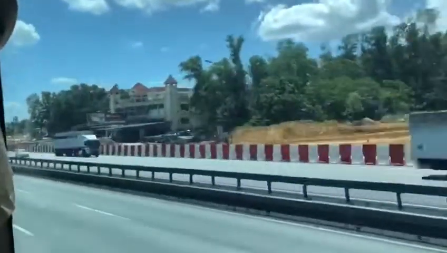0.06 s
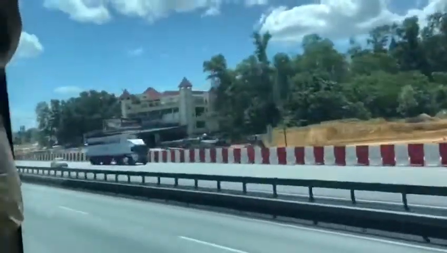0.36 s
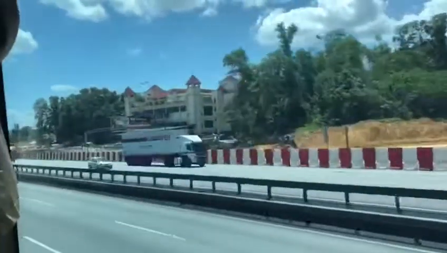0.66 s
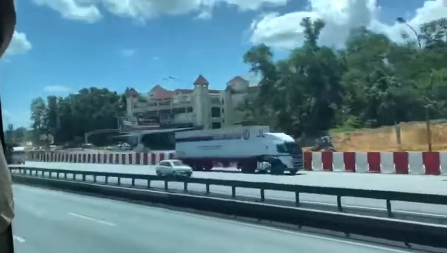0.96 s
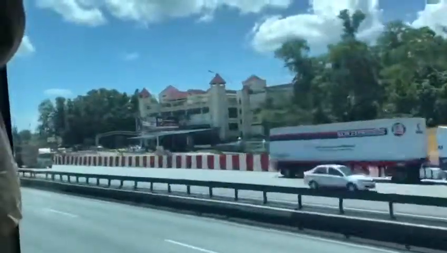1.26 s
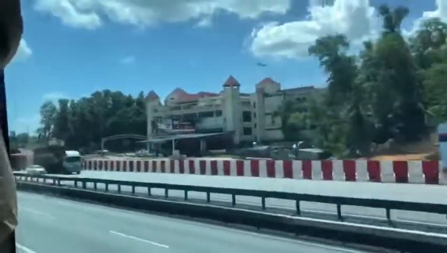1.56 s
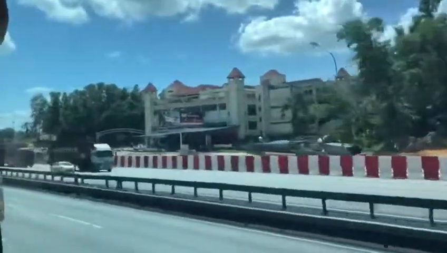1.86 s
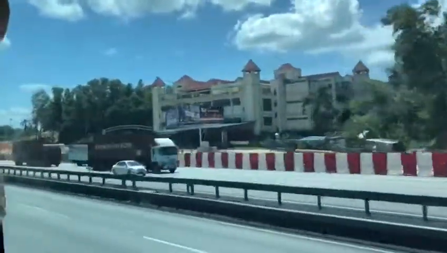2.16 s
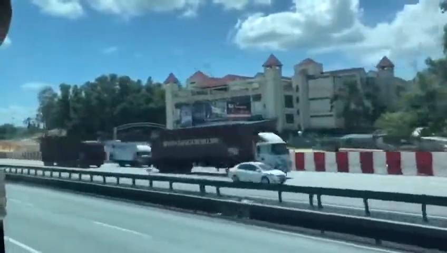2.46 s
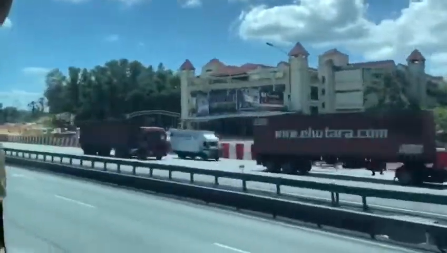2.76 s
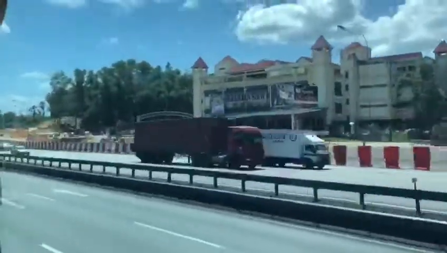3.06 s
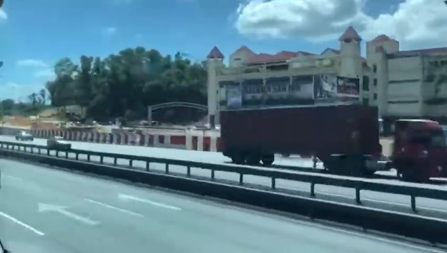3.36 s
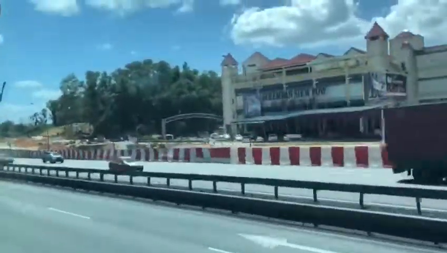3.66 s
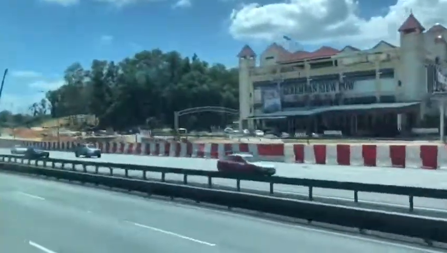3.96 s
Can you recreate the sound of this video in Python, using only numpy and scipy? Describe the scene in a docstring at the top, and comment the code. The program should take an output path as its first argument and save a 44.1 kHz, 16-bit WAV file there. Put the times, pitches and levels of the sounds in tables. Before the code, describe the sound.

A bus drones steadily along a highway, heard from inside, its engine booming over tyre rumble and wind hiss. Trim scrapes briefly at first, then a loose fitting squeaks, the wheels thump twice and oncoming traffic whooshes faintly.

```python
"""Inside a bus on a highway

The engine's firing note booms in the cabin over tyre rumble and wind hiss; drive shaft and cooling
fan add weaker hums. The wheels thump over bumps and drum on coarse asphalt, and oncoming traffic
whooshes faintly. A small loose metal fitting squeaks, a hard part ticks once, and the trim rattles
now and then and scrapes with a hissy squeak, mostly at the start."""
import sys
import numpy as np
from scipy import signal
from scipy.fft import rfft, irfft, next_fast_len
from scipy.io import wavfile
from scipy.ndimage import uniform_filter1d, map_coordinates

SR = 44100
rng = np.random.default_rng(int(sys.argv[2]) if len(sys.argv) > 2 else 0)


def pcm_store(signal):
    """Save signal as 16-bit PCM."""
    levels = np.round(np.clip(np.atleast_2d(signal), -1, 1) * 32767)
    wavfile.write(sys.argv[1], SR, levels.astype(np.int16).T)


N = 176400

# crankshaft speed (time [s], rotation rate [Hz])
CRANK = [(0, 24.84), (1.1, 25.9), (2.2, 24.74), (3.4, 25.43), (4, 24.5)]


def engine(firings_per_turn=3):
    """Periodic forcing: the cylinders fire at a multiple of the crank rate, amid weaker orders."""
    # firing note (time [s], level [dB])
    firing_level = [(0, -22), (.2, -20), (.42, -23.3), (.75, -21), (1.1, -21.5), (2.4, -21.5), (2.68, -20),
                    (2.9, -25), (3.08, -20.5), (3.38, -20.3), (3.52, -26), (3.72, -25), (3.87, -36),
                    (4, -31)]
    # other partials (order [multiple of crank rate], level [dB])
    orders = [(4, -35.5), (4.5, -34.5), (6, -39.5), (7, -49), (14, -41), (19, -51.5), (34, -72)]
    firing = hum(1, [(firings_per_turn, 0)], drift=0.0012, flutter_db=0.66, flutter_rate=11)
    overtones = hum(1, orders, drift=0.0015, flutter_db=2, flutter_rate=10)
    return amp(curve(firing_level)) * firing + overtones


def tyre_rumble(level_db=-27):
    """Structure-borne noise: rolling tyres send a low rumble through the floor."""
    # rumble spectrum (frequency [Hz], relative level [dB])
    spectrum = [(15, -34), (24, -13), (33, -13), (45, -1), (70, -1), (110, 1), (155, -1.8), (200, -8),
                (260, -8.5), (320, -14.5), (400, -15), (480, -20), (560, -22), (670, -22.5), (800, -23.5),
                (1100, -31), (1600, -42.5), (3000, -81)]
    # slow swell (time [s], gain [dB])
    swell = [(0, -0.2), (.5, -0.2), (1, 0.5), (1.55, 0), (1.9, 1), (2.35, 0.3), (2.9, 0.4), (3.5, -0.4),
             (3.72, 1.1), (4, -0.5)]
    return amp(level_db + curve(swell) + 0.23 * wobble(5.7)) * rush(spectrum, patchy_db=0.84)


def geared_parts():
    """Rotational harmonics: shaft, fan and gears sound at fixed ratios to the crank rate."""
    # drive shaft partials (order [multiple of shaft rate], level [dB])
    shaft_orders = [(3, -49.5), (4, -46.5), (6, -43.5), (7, -40), (10, -53), (15, -62)]
    # cooling fan partials (order [multiple of fan rate], level [dB])
    fan_orders = [(1, -35), (2, -39.5), (3, -41.5), (4, -41), (6, -51)]
    shaft = hum(1.531, shaft_orders, drift=0.0021, flutter_db=1.37, flutter_rate=22)
    fan = hum(2.184, fan_orders, drift=0.0024, flutter_db=2, flutter_rate=6.19)
    gear_whine = hum(26.65, [(1, -51.5)], drift=0.001, flutter_db=0.5, flutter_rate=13)
    return shaft + fan + gear_whine


def bumps(attack_s=0.0023):
    """Impulse response: each bump sets the body's damped modes ringing."""
    # bumps in the road (time [s], level [dB])
    impacts = [(.636, -22), (.653, -20.5), (2.237, -16.5), (2.2475, -20)]
    # body modes (frequency [Hz], gain [dB], T60 [s])
    modes = [(142, -11, 0.07), (195.5, 4.5, 0.092), (226, -6, 0.082), (288, -8, 0.073)]
    out, t = np.zeros(N), np.arange(SR // 3) / SR
    ring = sum(amp(db - 60 * t / t60) * np.sin(2 * np.pi * hz * t) for hz, db, t60 in modes)
    for s, db in impacts:
        add(out, s, amp(db) * ring * (1 - np.exp(-t / attack_s)))
    return out


def coarse_asphalt():
    """Roughness excitation: a coarse stretch of road drums in a low band."""
    # coarse stretch (centre time [s], level [dB], half length [s])
    stretch = [(2.05, -31.5, 0.37)]
    # drumming spectrum (frequency [Hz], relative level [dB])
    spectrum = [(90, -21), (135, 3.5), (170, 0.5), (220, -22), (400, -48)]
    return swells(stretch) * rush(spectrum, patchy_db=1.5)


def wind(level_db=-46):
    """Flow noise: air along the windows makes a broadband hiss, coloured by the cabin."""
    # hiss spectrum (frequency [Hz], relative level [dB])
    spectrum = [(300, -10), (800, -1), (1150, 0.5), (1320, -1), (1560, 1.8), (1900, -1), (2300, -3.5),
                (2550, -2.1), (3200, -4), (3600, -5.5), (4400, -5), (5300, -9.5), (7000, -13.5),
                (8800, -17), (9600, -19.5), (11500, -22), (13000, -48)]
    # slow swell (time [s], gain [dB])
    swell = [(0, 0.5), (.7, -1.2), (1.3, -0.8), (2, -0.5), (2.55, -0.4), (2.95, -0.5), (3.45, -1), (4, -1)]
    return amp(level_db + curve(swell) + 0.14 * wobble(13)) * cabin(rush(spectrum, patchy_db=0.5))


def fitting(squeak_hz=8703, attack_s=0.0015, release_s=0.012, contact_s=0.0094):
    """Stick-slip friction: a loose metal part catches with a tick and squeaks scratchily."""
    # distinct squeaks (time [s], relative level [dB], hold [s])
    squeaks = [(0.3844, -49, .028), (0.4499, -45.5, .022), (0.61, -54, .012), (0.7647, -55, .035),
               (1.3079, -47.5, .012), (1.5529, -60, .03), (1.6297, -58, .025), (1.938, -57, .028),
               (2.0896, -50, 0.026), (2.2672, -50.5, 0.029), (2.4528, -42, 0.02), (2.6145, -49, .028),
               (2.6961, -51, 0.02), (2.7831, -55, .028), (2.8604, -56, .025), (2.9307, -50, 0.026),
               (3.2994, -55, .03), (3.6042, -49.5, .018), (3.7818, -59, .028), (3.8591, -56, .025)]
    # contact noise spectrum (frequency [Hz], relative level [dB])
    spectrum = [(6000, -30), (7900, -28), (8400, -17), (8780, 3), (9200, -6), (9600, -24), (11500, -28)]
    tone_db, scratch_db, contact_db = -7.5, -19, -9
    faint_db, scatter_db, faint_hold_s = -65, 3, 0.023
    # each engine cycle (two crank turns) shakes out a faint squeak as well
    cycles = np.floor(np.cumsum(curve(CRANK)) / SR / 2)
    shake_times = np.flatnonzero(np.diff(cycles)) / SR
    faint = [(s, faint_db + scatter_db * rng.standard_normal(), faint_hold_s) for s in shake_times]
    t = np.arange(SR // 8) / SR
    rise = 1 - np.exp(-t / attack_s)
    rub, catch = np.zeros(N), np.zeros(N)
    for s, db, hold in list(squeaks) + faint:
        add(rub, s, amp(db) * rise * np.exp(-np.maximum(t - hold, 0) / release_s))
        add(catch, s, amp(db) * rise * np.exp(-t / contact_s))
    phase_jitter = 0.35 * wobble(250) + 0.9 * wobble(25)
    tone = np.sin(2 * np.pi * squeak_hz * np.arange(N) / SR + phase_jitter)
    grit = rush(spectrum, patchy_db=2.5)
    slip = amp(wobble(350))
    squeak = slip * rub * (amp(tone_db) * tone + amp(scratch_db) * grit)
    return squeak + amp(contact_db) * catch * grit


def trim_rattle(release_s=0.018, grain_db=2.5):
    """Contact chatter: the cabin trim rattles in short bursts of gritty noise."""
    # rattles (time [s], level [dB], rise [s], hold [s])
    rattles = [(0.96, -55.5, 0.027, 0.046), (1.012, -56, .003, .004), (1.22, -49, .01, .012),
               (2.14, -50, 0.0074, .012), (2.453, -45, .004, 0.021), (3.07, -55.5, .008, .022)]
    # rattle spectrum (frequency [Hz], relative level [dB])
    spectrum = [(1000, -7), (2500, -7), (4000, -2.5), (6000, -2), (8000, -4), (10000, -5), (12000, -16)]
    shake, t = np.zeros(N), np.arange(N) / SR
    for s, db, rise, hold in rattles:
        onset = np.clip((t - s) / rise, 0, 1)
        decay = np.exp(-np.maximum(t - s - rise - hold, 0) / release_s)
        shake += amp(db) * onset * decay
    grit = rush(spectrum, patchy_db=1)
    return shake * unit(amp(grain_db * wobble(600)) * grit)


def trim_scrape(slip_db=2.2):
    """Friction noise: trim rubs on trim in tiny slips, giving a rough, hissy squeak."""
    # scrapes (centre time [s], level [dB], half length [s])
    scrapes = [(.04, -48.5, .05), (.118, -49, .065), (1.195, -53.5, .012)]
    # squeak spectrum (frequency [Hz], relative level [dB])
    spectrum = [(2000, -18), (2600, -4), (3300, -18), (3800, -9), (4020, 6), (4300, -8), (4850, -6),
                (5090, 10.5), (5270, -4), (5450, 1), (5700, -6.5), (6400, -1.5), (7100, -15), (7700, -3.5),
                (8600, -8), (11000, -19)]
    slips = amp(slip_db * wobble(450))
    return swells(scrapes) * unit(slips * rush(spectrum, patchy_db=2.0))


def tick(start_s=0.131, gain_db=-37, attack_s=0.0015, t60_s=0.025):
    """Damped resonance: a small hard part gives one bright tick."""
    # resonance of the part (frequency [Hz], relative level [dB])
    spectrum = [(4000, -22), (7600, -14), (8100, 0), (8600, 2), (9100, -16), (9750, -8), (10400, -16),
                (12000, -24)]
    t = np.maximum(np.arange(N) / SR - start_s, 0)
    envelope = amp(gain_db - 60 * t / t60_s) * (1 - np.exp(-t / attack_s))
    return envelope * rush(spectrum, patchy_db=0)


def traffic():
    """Pass-by noise: oncoming tyres swell and fade faintly behind the glass."""
    # passing vehicles (time when nearest [s], level [dB], half length [s])
    passes = [(1.24, -51, 0.11), (2.54, -48, .1), (2.92, -48.5, .08), (3.24, -44, 0.07), (3.61, -48, 0.06)]
    # tyre noise spectrum (frequency [Hz], relative level [dB])
    spectrum = [(500, -8), (850, 5), (1200, -4.5), (1520, -1), (1730, 0), (2000, -16), (2600, -8),
                (3700, -13.5), (8000, -28)]
    return swells(passes) * rush(spectrum, patchy_db=1.5)


def cabin(x, t60_s=0.07, echo_db=-10):
    """Interference: close reflections off glass and panels ripple the spectrum; rms 1."""
    t = np.arange(SR // 8) / SR
    tail = rng.standard_normal(len(t)) * amp(-60 * t / t60_s)
    echo = signal.fftconvolve(x, tail / np.linalg.norm(tail))[:N]
    return unit(x + amp(echo_db) * echo)


def hum(ratio, orders, drift, flutter_db, flutter_rate):
    """Superposition: fluttering partials of a part running at ratio times the crank rate."""
    rate_hz = ratio * curve(CRANK) * (1 + drift * wobble(9))
    angle = 2 * np.pi * np.cumsum(rate_hz) / SR
    out = np.zeros(N)
    for order, db in orders:
        rms = amp(db + flutter_db * wobble(flutter_rate))
        out += np.sqrt(2) * rms * np.sin(order * angle + rng.uniform(0, 2 * np.pi))
    return out


def rush(spectrum, patchy_db):
    """Spectral shaping: coloured noise of rms 1 with random patches of gain in time and frequency."""
    bins = signal.stft(rng.standard_normal(N), nperseg=512)[2]
    patches = uniform_filter1d(rng.standard_normal(bins.shape), size=6, axis=0)
    patches = uniform_filter1d(patches, size=16, axis=1)
    noise = signal.istft(bins * amp(patchy_db * unit(patches)), nperseg=512)[1][:N]
    f, db = np.transpose(spectrum)
    return unit(filtered(noise, lambda hz: amp(np.interp(np.log(hz + 1), np.log(f), db))))


def swells(rows):
    """Power addition: the joint gain of Gaussian swells (time [s], level [dB], half length [s])."""
    t = np.arange(N) / SR
    return np.sqrt(sum(amp(2 * db) * np.exp(-((t - s) / half) ** 2) for s, db, half in rows))


def amp(db):
    """Decibels to amplitude ratio."""
    return 10 ** (np.asarray(db) / 20)


def unit(x):
    """Normalisation to rms 1."""
    return x / np.sqrt(np.mean(x ** 2) + 1e-20)


def curve(rows):
    """Linear interpolation of (time [s], value) points at every sample."""
    return np.interp(np.arange(N) / SR, *np.transpose(rows))


def wobble(rate):
    """Random modulation: a smooth curve through rate knots a second."""
    knots = rng.standard_normal(int(N * rate / SR) + 4)
    return map_coordinates(knots, [np.arange(N) * rate / SR], mode="nearest")


def filtered(x, response):
    """Linear filtering: the spectrum of x times a frequency response."""
    size = next_fast_len(N + SR // 2)
    return irfft(rfft(x, size) * response(np.fft.rfftfreq(size, 1 / SR)), size)[:N]


def add(track, s, sound):
    """Superpose a sound on the track at time s."""
    part = track[max(round(s * SR), 0):][:len(sound)]
    part += sound[:len(part)]


def scene():
    """Superposition of all sources at a window seat, in mono."""
    drivetrain = engine() + geared_parts()
    travel = tyre_rumble() + wind() + coarse_asphalt() + traffic() + bumps()
    loose_parts = fitting() + trim_rattle() + trim_scrape() + tick()
    return (drivetrain + travel + loose_parts)[None]


def record(dry, cutoff_hz=11900):
    """Band limiting: an ideal low-pass removes everything above the cutoff."""
    return filtered(dry[0], lambda hz: hz < cutoff_hz)[None]


dry = scene()
out = record(dry)
pcm_store(out)
```